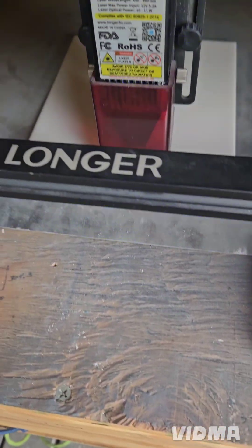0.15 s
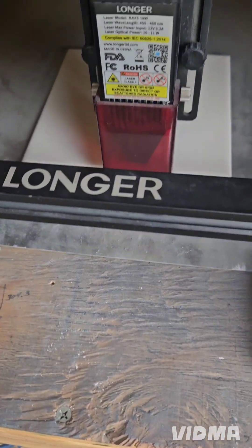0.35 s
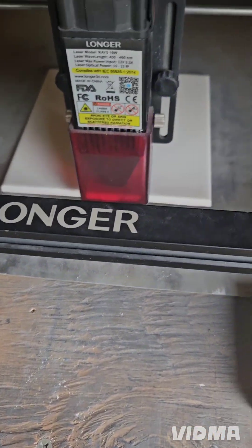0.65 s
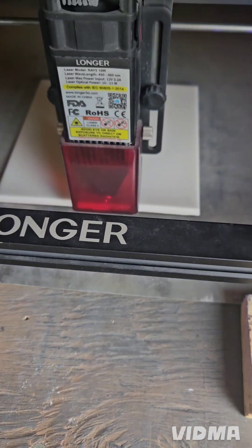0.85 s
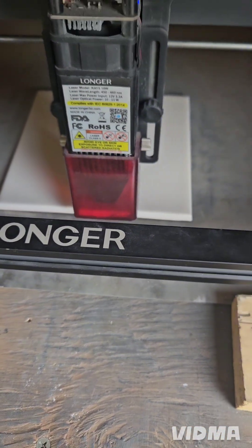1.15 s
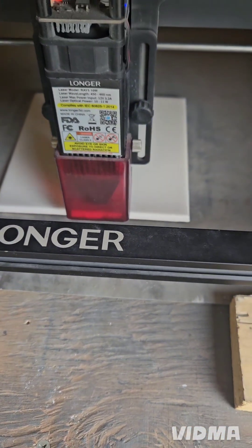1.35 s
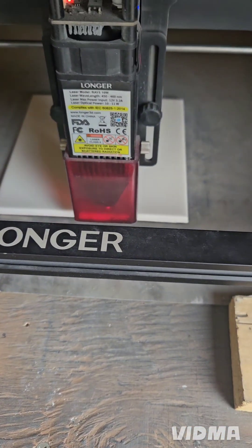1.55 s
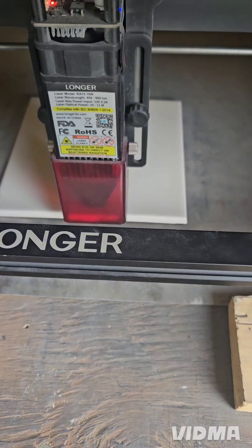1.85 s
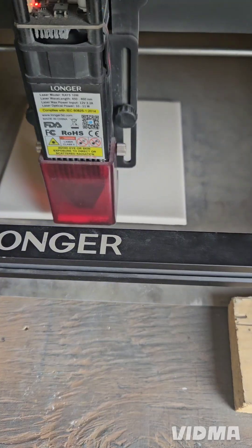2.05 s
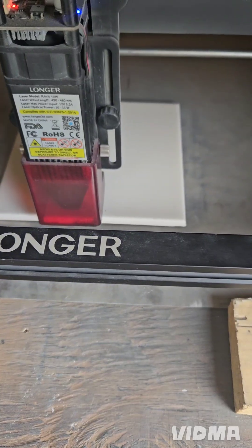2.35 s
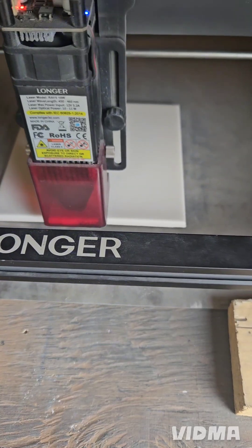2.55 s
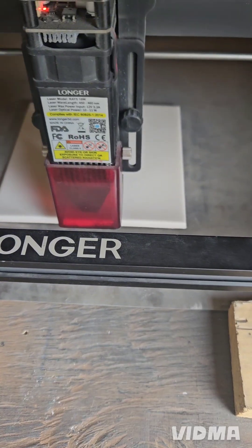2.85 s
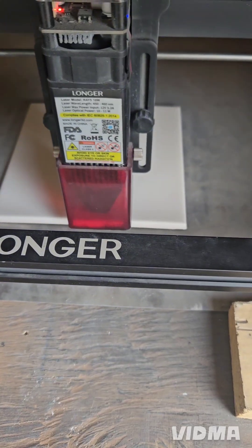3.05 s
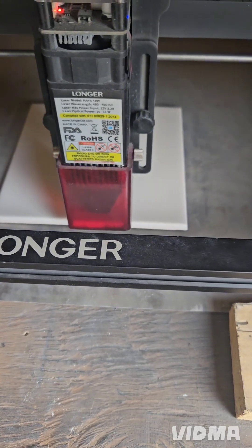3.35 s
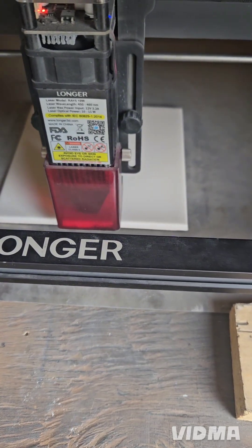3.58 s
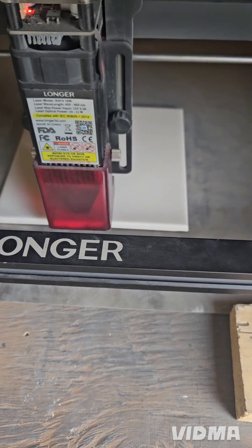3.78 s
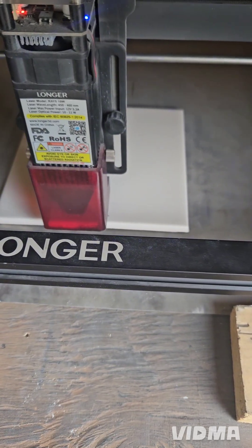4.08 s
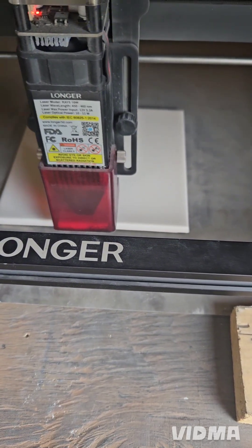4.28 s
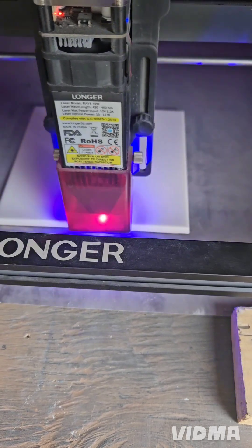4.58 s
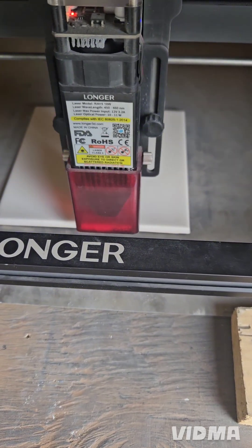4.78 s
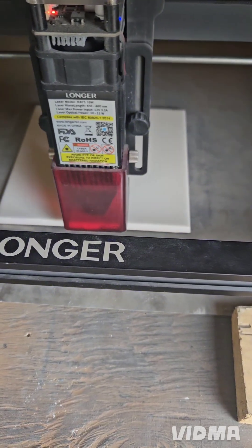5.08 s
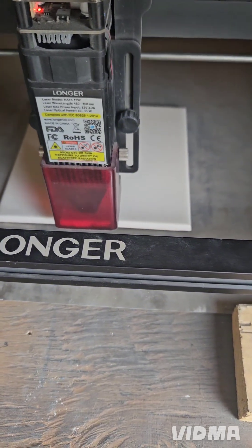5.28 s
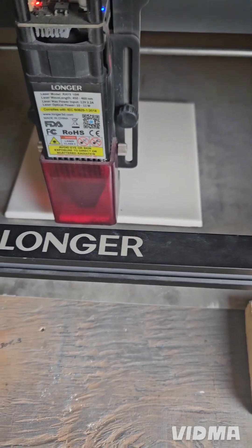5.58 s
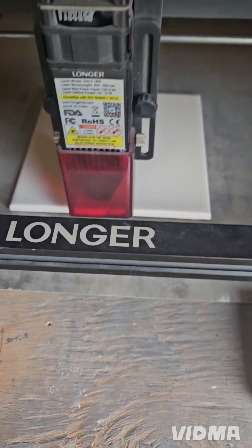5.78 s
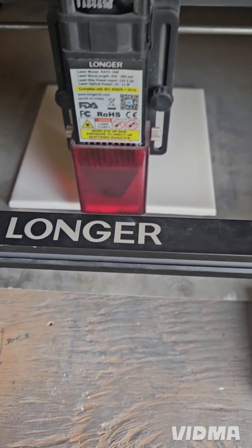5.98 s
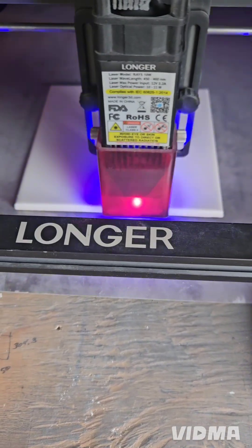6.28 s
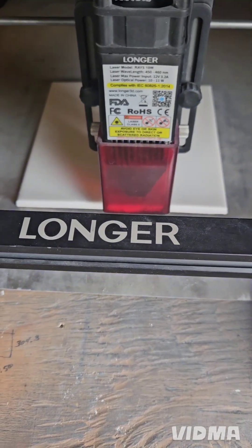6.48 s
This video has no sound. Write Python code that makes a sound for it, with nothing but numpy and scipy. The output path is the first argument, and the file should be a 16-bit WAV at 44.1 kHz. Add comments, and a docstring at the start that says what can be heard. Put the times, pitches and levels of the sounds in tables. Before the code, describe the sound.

A small laser engraver runs close below the microphone, its cooling fans giving a steady airy hum with a low, wavering rumble. For the first 1.7 seconds a motor whines through short sweeps, reversing nearly four times a second, each turn bringing a brief grunt and shudder of the frame. The beam adds tiny buzzing, sizzling bursts about seven times a second, with occasional small pops. A hard belt knock lands just after 1 second. From 1.7 seconds the sweeps lengthen, the whine dipping and the frame jolting about every 0.8 seconds. The burns now come in pairs or small clusters, around 2.4, 3 to 3.4, 4, 4.6 to 5, 5.6 and from 6.2 seconds, the fan pitch sagging slightly with them. A wheel gives thin, falling squeaks between 3.5 and 5 seconds. Another firm knock comes near 6.4 seconds as the machine keeps working.

```python
"""A small diode laser engraver at work, heard from a phone held just above the gantry.
Cooling fans hum throughout, the head fan sagging as the beam fires. A stepper motor whines through short
sweeps, shaking the frame at each reversal; the pulsed beam buzzes, pops and sizzles over each stroke of
the drawing. The slack belt jolts the frame at the turns, with a hard knock just after 1 s. From 1.7 s
the sweeps are longer; a carriage wheel squeaks, most of all between 3.5 and 5 s."""
import sys
import numpy as np
from scipy import signal
from scipy.fft import rfft, irfft
from scipy.io import wavfile

SR = 44100
rng = np.random.default_rng(int(sys.argv[2]) if len(sys.argv) > 2 else 0)


def persist_wave(psi):
    """Save psi, clipped to +-1, as 16-bit WAV."""
    counts = np.round(np.clip(psi, -1, 1) * 32767).astype(np.int16)
    wavfile.write(sys.argv[1], SR, np.atleast_2d(counts).T)


N = 292383
T = np.arange(N) / SR
HZ = np.maximum(np.arange(N // 2 + 1) * SR / N, 1)
COIL_HZ = 87.49  # stepper coil frequency at full speed

# the head reverses just past the drawing:
# t/s, shudder level/dB, grunt f/Hz, grunt over shudder/dB, grunt delay/s, grunt pitch scatter/share
REVERSALS = [(-.021, -33.5, 300, 3.5, 0.021, 0.089), (.247, -34, 410, 2, 0.0029, .04),
             (0.525, -33, 408, 3, 0.0086, 0.032), (0.814, -33, 530, 1.5, 0.0042, .05),
             (1.094, -33.5, 455, 1, 0.013, .07), (1.3748, -34.5, 460, 1.5, 0.019, 0.15),
             (1.664, -31.5, 515, -1.5, 0.022, 0.064), (2.458, -32.5, 490, 0.5, -0.0042, 0.19),
             (3.253, -31.5, 515, 0, .029, 0.11), (4.0478, -31.5, 445, -2, .014, 0.12),
             (4.8388, -34.5, 500, -0.5, 0.012, .13), (5.6252, -34.5, 465, .5, 0.009, 0.071),
             (6.417, -33, 400, -5, -0.015, 0.33)]
# the beam fires over a stroke, on the way into a reversal or out of it:
# t/s, length/s, buzz gain/dB, rasp gain/dB, sizzle gain/dB
STROKES = [(.034, 0.015, -7, 1.5, -1), (0.163, 0.026, -1.5, 2, -2), (0.306, 0.03, -3, -1.5, -2),
           (0.45, 0.014, -4, -1.5, 2.5), (0.586, 0.027, -4, -3, 3.5), (0.72, 0.037, -1, -2, 2.5),
           (0.871, 0.03827, -2.5, -0.5, 2.5), (1.017, 0.02, -14, .5, 0), (1.151, 0.024, -5.5, 0.5, 3.5),
           (1.284, .034, -1.5, -1.5, 0), (1.433, 0.035, 0.5, -2.5, 2.5), (1.575, 0.027, 1.5, 2, 0.5),
           (1.723, 0.029, -2, 0, 1), (1.847, 0.041, 1, -0.5, 3), (2.39, 0.009, -1, -5, -3),
           (2.51, .012, 0, 0, -0.5), (3.021, 0.037, 0.5, -2, 1), (3.157, 0.035, -2.5, 0, 2),
           (3.315, 0.031, 0.5, -1.5, 1.5), (3.44, 0.036, -0.5, 0.5, 0.5), (3.975, .019, -2, 3.5, -2),
           (4.103, 0.0132, 0, 0.5, 3.5), (4.616, .044, -1, -1, 2.5), (4.747, 0.036, -1.5, -1, 0.5),
           (4.895, .035, -3, 0, -1), (5.016, .045, 2, -1, 3.5), (5.552, .018, 3, 0.5, -1.5),
           (5.685, .016, 1, 0, 3), (6.187, 0.053, -0.5, -2.5, 1.5), (6.32, 0.032, 1, -2.5, 0),
           (6.478, 0.04, -1, -1.5, 1), (6.595, 0.027, -1, -2.5, -1)]


def burns(aim_db, beam_hz=1003, rise_s=.00071, fall_s=.0053, settle_s=.0094, heat_s=.0083, chirp_s=.018):
    """Each beam pulse puffs off vapour: a rough chirp, then a buzz and a sizzle once the spot is hot."""
    # spectra of the vapour plume: f/Hz, level/dB
    crackle_spectrum = [(400, -11), (650, 0), (900, 12.5), (1400, 11), (2200, 11), (3400, -6.5), (4800, 1),
                        (6500, -33), (12000, -26)]
    sizzle_spectrum = [(2500, -2), (5500, -10.5), (7400, 7), (8300, 7.5), (9200, -4.5), (11000, -3),
                       (14000, -2.5), (15500, -2.5)]
    # bands among which the plume's hiss wanders: f/Hz
    hiss_bands = [2730, 3000, 4130, 4600, 5200, 6030]
    firing, settled, hot, fresh = 0, 0, 0, 0
    for start, length, buzz_db, rasp_db, sizzle_db in STROKES:
        firing += undb(rasp_db) * gate(start, length, rise_s, fall_s)
        settled += undb(buzz_db) * gate(start, length - .003, settle_s, fall_s)
        hot += undb(sizzle_db) * gate(start, length - .004, heat_s, fall_s)
        fresh += undb(rasp_db) * gate(start, min(chirp_s, length), rise_s, fall_s)
    pulse_hz = beam_hz * (1 + .0065 * drift(120))
    fundamental = tone(pulse_hz * (1 + .04 * drift(200)))
    third = tone(3 * pulse_hz)
    buzz = settled * undb(-40.5) * (undb(-7) * fundamental + tone(2 * pulse_hz) + undb(-14) * third)
    chirp = fresh * undb(-39) * fundamental
    puffs = (1 + .3 * tone(pulse_hz) / np.sqrt(2)) * undb(3 * drift(250))
    crackle = unit(colour(puffs * port_noise(), shape(crackle_spectrum)))
    sizzle = unit(colour(puffs * port_noise(), shape(sizzle_spectrum)))
    hiss = puffs * sum(undb(-55 + 2 * drift(8)) * band(port_noise(), hz, 800) for hz in hiss_bands)
    pitched = (buzz + chirp) * undb(.72 * drift(175))
    rasp = firing * (undb(-38.5) * crackle + hiss)
    return pitched + rasp + pops() + hot * undb(-41 + aim_db) * sizzle


def pops(level_db=-30, pop_s=.0013):
    """Specks of the surface burst under the beam."""
    # bursting specks: t/s, gain/dB
    specks = [(.756, -10), (0.876, -10), (1.019, -15), (1.577, -17), (1.851, -1), (3.026, -3), (3.159, -10),
              (3.444, -5), (3.982, -5), (3.99, 2), (4.62, -7), (4.66, -2), (4.93, 3), (5.059, 5),
              (5.062, 1), (5.56, 5), (6.478, -7)]
    bursts = sum(undb(level_db + db) * gate(s, pop_s, pop_s / 10, pop_s) for s, db in specks)
    return bursts * band(port_noise(), 1560, 2500)


def stepper(speed, flutter_db=2.5, steady_order=40):
    """Torque ripple sings at multiples of the coil frequency and fades as the motor slows."""
    # torque ripple at full speed: multiple of the coil frequency, level/dB
    orders = [(1, -40.5), (2, -48.5), (4, -53), (5, -58), (8, -55), (20, -61), (28, -63), (32, -53),
              (40, -63), (62, -66), (64, -52.6), (66, -54), (80, -72), (90, -72), (96, -70)]
    coil_hz = COIL_HZ * speed * (1 + .00017 * drift(19))
    whine = 0
    for order, db in orders:
        flutter = flutter_db / (1 + (order / steady_order) ** 2) * drift(14)  # the low hum flutters most
        whine += undb(db + flutter) * tone(order * coil_hz)
    return whine * (.031 + .93 * speed ** 2)


def head_speed(ramp_s=.057):
    """Share of full speed: the head brakes evenly into each reversal and speeds up again."""
    gap_s = np.min([np.abs(T - s) for s, *_ in REVERSALS], axis=0)
    return np.minimum(gap_s / ramp_s, 1)


def shudder(speed, grunt_s=.0096, sway_hz=103):
    """At a crawl the motor grunts and jolts the frame; the gantry sways on afterwards."""
    grunts, wobble = 0, drift(150)
    for s, db, hz, grunt_db, delay_s, scatter in REVERSALS:
        grunts += undb(db + grunt_db) * bell(T - s - delay_s, grunt_s) * tone(hz * (1 + scatter * wobble))
    # the step harmonics sweep through the modes of the frame
    steps = sum(tone(order * COIL_HZ * speed) for order in (4, 8, 16))
    rattle = undb(-3.5) * unit(frame(steps + 25 * noise())) * reversal_swell(.034, late_s=.014)
    sway = tone(sway_hz * (1 + .132 * drift(28.1))) * reversal_swell(.06, late_s=.029)
    # the driver sings thinly while the coils are nearly at rest
    chirr = undb(-27) * band(noise(), 6430, 400) * reversal_swell(.07)
    return grunts + rattle + sway + chirr


def reversal_swell(width_s, late_s=0, belt_lag_s=.0091):
    """A bell of level just after each reversal, which reaches the frame late through the belt."""
    turn_s, db = np.transpose(REVERSALS)[:2]
    peak_s = turn_s + belt_lag_s + late_s
    nearest = np.searchsorted((peak_s[1:] + peak_s[:-1]) / 2, T)
    return undb(db)[nearest] * bell(T - peak_s[nearest], width_s)


def belt_knocks(force_db=29, sway_db=-23, sway_hz=108, sway_s=.021):
    """The belt takes up its slack with blows and bounces; the hardest leaves the gantry swaying."""
    # blows on the gantry: t/s, relative force/dB, contact time/s
    blows = [(0.2537, -11.5, 0.00021), (0.2693, -14, .0004), (0.531, -9, 0.00039), (0.821, -14, .0004),
             (.834, -14.5, 0.00022), (1.149, 2.5, 0.00033), (1.157, -14, 0.0002), (1.166, -17, 0.00038),
             (1.176, -9, 0.00025), (1.672, -1, 0.00076), (1.683, -16, 0.00079), (1.699, -10.5, .0002),
             (1.718, -13.5, 0.00044), (2.473, -14, 0.00065), (2.4784, -10, 0.00034),
             (3.2633, -4.5, 0.00047), (3.278, -16, 0.00037), (3.307, -10, 0.00045), (4.065, -7, 0.00097),
             (4.851, -19, 0.00029), (4.863, -8, 0.00032), (5.644, -13, 0.00021), (6.402, -11, 0.00023),
             (6.419, -11, 0.00034), (6.43, -1.5, 0.00072)]
    force = np.zeros(N)
    for s, db, contact_s in blows:
        span = slice(int((s - .01) * SR), int((s + .01) * SR))
        push = bell(T[span] - s, contact_s)
        force[span] += undb(db) * push / push.sum()
    hardest_s = max(blows, key=lambda row: row[1])[0]
    sway = undb(sway_db) * gate(hardest_s, sway_s, sway_s / 4, sway_s) * tone(np.full(N, sway_hz))
    return undb(force_db) * frame(force) + sway


def frame(force, soft_hz=2600):
    """The frame rings in its modes; belt and rubber feet soak up the treble."""
    # modes of the frame: f/Hz, width/Hz, gain/dB
    modes = [(87.5, 6.2, 6), (141.4, 30, 2), (208.5, 22, 2), (300.5, 48, -1.5), (432, 14.5, 2),
             (536.5, 24, -5.5), (685, 71, -8)]
    response = sum(undb(db) * resonance(hz, width) for hz, width, db in modes)
    return colour(force, response / (1 + 1j * HZ / soft_hz) ** 2)


def wheel_squeaks():
    """A carriage wheel rubs on its rail in short, thin glides."""
    # squeaks: t/s, length/s, first f/Hz, last f/Hz, level/dB, pitch scatter/share
    glides = [(1.38, .3, 11380, 11480, -60, .008), (3.565, .115, 5350, 5100, -45, .012),
              (3.605, .105, 2660, 2470, -45.5, .028), (3.655, .08, 4900, 4550, -50.5, .04),
              (3.68, .13, 4200, 3850, -51.5, .055), (3.82, .14, 3500, 2950, -50, .07),
              (4.85, .05, 5300, 5100, -49, .018), (4.83, .08, 2600, 2480, -48, .022),
              (4.93, .18, 3900, 3300, -52, .06)]
    out = 0
    for start, length, first_hz, last_hz, db, scatter in glides:
        progress = np.clip((T - start) / length, 0, 1)
        hz = (first_hz + (last_hz - first_hz) * progress) * (1 + scatter * drift(300))
        out += undb(db + 2 * drift(69)) * np.sin(np.pi * progress) * tone(hz)
    return out


def fan_tones(full_speed_hz=585.8):
    """Blade tones follow the head fan's speed, the other fans hum on; all waver in the turbulent air."""
    # fan on the laser head: multiple of the blade rate, level/dB
    blade_orders = [(1, -62), (2, -49), (3, -57.5), (4, -63), (5, -53), (7, -60.5)]
    # hum of the other fans: f/Hz, level/dB
    hums = [(118.4, -44.5), (248, -50)]
    blade_hz = full_speed_hz * fan_speed() * (1 + .000597 * drift(5))
    blades = sum(undb(db + .74 * drift(9)) * tone(order * blade_hz) for order, db in blade_orders)
    hum = sum(undb(db + 2 * drift(16.7)) * tone(hz * (1 + .0065 * drift(25))) for hz, db in hums)
    return blades + hum


def fan_speed(sag=.052, inertia_s=.27):
    """Share of full speed: the beam loads the supply, so the head fan slows in burns, then recovers."""
    beam_on = sum((T > start) & (T < start + length) for start, length, *_ in STROKES)
    step = 1 / (inertia_s * SR)
    return 1 - sag * signal.lfilter([step], [1, step - 1], beam_on)


def fan_air(level_db=-36.5, shared_hz=500):
    """Air rushes through the housing; the two microphone ports share its bass more than its treble."""
    # rush of the fans: f/Hz, level/dB
    rush = [(20, -12), (40, 1), (75, 5.5), (105, 3), (160, -7), (330, -10), (800, -10.5), (1250, -11.5),
            (1750, -15.5), (2500, -16), (5000, -20), (6400, -26.5), (8400, -24), (9700, -40.5),
            (11000, -39.5), (15000, -43)]
    # resonances of the fan housing: f/Hz, width/Hz, gain/dB
    housing = [(470, 17, 1.5), (515, 75, 5.5), (904, 25, 10), (1052, 46, 7), (1413, 138, 6),
               (1684, 294, 8.5), (2610, 190, -3), (2896, 61, 7.5), (3090, 170, 3.5), (3400, 130, -4.5),
               (3840, 110, -0.5), (4370, 250, -4.5), (7040, 130, 0.5)]
    gain = shape(rush) * undb(sum(db * np.abs(resonance(hz, width)) ** 2 for hz, width, db in housing))
    alike = .5 + .5 / (1 + (HZ / shared_hz) ** 2)
    left = noise()
    right = colour(left, alike) + colour(noise(), np.sqrt(1 - alike ** 2))
    return np.array([unit(colour(side, gain)) for side in (left, right)]) * undb(level_db)


def swell_rumble(fans, corner_hz=85, swing_db=2.4):
    """The fans' low rumble swells and sinks at random about a slow trend."""
    # trend of the rumble: t/s, gain/dB
    trend = [(0, -3), (2, 1.5), (3.6, -2.5), (4.3, -0.5), (5.3, 3), (5.9, 3.5), (6.63, -1)]
    gain = undb(np.interp(T, *np.transpose(trend)) + swing_db * drift(6))
    return fans + (gain - 1) * colour(fans, 1 / (1 + (HZ / corner_hz) ** 4))


def enclosure(x, t60_s, wet_db):
    """Close walls return a short wash, different at each port; the bass stays direct."""
    tail = np.exp(-np.log(1000) * T / t60_s) * (T > .001)
    washes = [colour(unit(noise() * tail), HZ / (HZ + 400)) / np.sqrt(N) for _ in range(2)]
    return np.array([port + undb(wet_db) * signal.fftconvolve(port, wash[:N // 2])[:N]
                     for port, wash in zip(np.broadcast_to(x, (2, N)), washes)])


def undb(db):
    """Decibels to gain."""
    return 10 ** (np.asarray(db) / 20)


def unit(x):
    """Scale to rms 1."""
    return x / np.sqrt(np.mean(x ** 2))


def shape(points):
    """Gain at every frequency from points of f/Hz, level/dB."""
    hz, db = np.transpose(points)
    return undb(np.interp(np.log(HZ), np.log(hz), db))


def colour(x, gain):
    """Filter with a gain for every frequency."""
    return irfft(rfft(x) * gain, N)


def shelf(x, corner_hz, db):
    """Move everything above a corner by a level curve."""
    return x + (undb(db) - 1) * colour(x, 1 / (1 + (corner_hz / HZ) ** 4))


def resonance(hz, width):
    """Response of one damped mode, 1 at its centre."""
    return 1 / (1 + 1j * (HZ ** 2 - hz ** 2) / (HZ * width))


def band(x, hz, width):
    """One resonant band of a signal, at rms 1."""
    return unit(colour(x, resonance(hz, width) ** 2))


def noise():
    """White noise."""
    return rng.standard_normal(N)


def port_noise(alike=.15):
    """White noise at the two microphone ports, only partly alike."""
    left = noise()
    return np.array([left, alike * left + np.sqrt(1 - alike ** 2) * noise()])


def drift(rate_hz):
    """Random drift of rms 1, mostly slower than the given rate."""
    knots = rng.standard_normal(int(2 * rate_hz * N / SR) + 3)
    return unit(np.interp(2 * rate_hz * T + rng.random(), np.arange(len(knots)), knots))


def tone(hz):
    """A sine of rms 1 on a pitch curve."""
    return np.sqrt(2) * np.sin(2 * np.pi * (np.cumsum(hz) / SR + rng.random()))


def bell(offset_s, width_s):
    """Gaussian envelope, 1 at zero offset."""
    return np.exp(-.5 * (offset_s / width_s) ** 2)


def gate(start, length, rise, fall):
    """Envelope that opens at start, holds for length and dies away."""
    out = np.zeros(N)
    span = slice(max(int(start * SR), 0), int((start + length + 10 * fall) * SR))
    age = np.maximum(T[span] - start, 0)
    out[span] = (1 - np.exp(-age / rise)) * np.exp(-np.maximum(age - length, 0) / fall)
    return out


def scene():
    """The machine at the phone's two microphone ports, hand-held just above the gantry."""
    # where the phone is held, each level taken about its mean: t/s, nearness to the head/dB, treble/dB
    phone_path = [(0.0, -49, -58), (0.98, -43.5, -64), (1.31, -43.5, -56.5), (1.989, -41.5, -57.5),
                  (5.04, -41.5, -57.5), (5.56, -41.5, -55.5), (5.78, -43.5, -61.5), (5.95, -43.5, -68),
                  (6.63, -45.5, -59.5)]
    # the motor's high whine as it reaches the phone: t/s, gain/dB
    whine_reach = [(0, -26), (.4, -6.5), (2.6, -1.5), (4.2, -1.5), (5.4, -1.5), (6.63, -3.5)]
    # right port against left port: f/Hz, gain/dB
    far_port = [(30, 3), (110, -3.5), (350, -4), (750, -8.5), (1100, -4), (1500, -12.5), (2100, -0.5),
                (3000, -9), (4500, -2), (6500, -11), (15000, -10)]
    s, *levels = np.transpose(phone_path)
    near_db, aim_db = (np.interp(T, s, db - np.mean(db)) for db in levels)
    speed = head_speed()
    fans = shelf(fan_air() + fan_tones(), 1570, near_db)
    # treble from the fan outlet is beamed, so it falls when the phone is off to one side
    fans = swell_rumble(shelf(fans, 5800, aim_db - near_db))
    motor = shelf(stepper(speed), 1800, np.interp(T, *np.transpose(whine_reach)))
    jolts = enclosure(shudder(speed) + belt_knocks(), t60_s=.07, wet_db=-3)
    jolts *= undb([[0], [-2.5]])  # the frame is closest to the left port
    head = enclosure(burns(aim_db) + wheel_squeaks(), t60_s=.081, wet_db=-5)
    left, right = fans + motor + jolts + head
    # treble reaches the right port late; the lows come through the table to both at once
    lag_s = .00052 / (1 + (1100 / HZ) ** 4)
    return np.array([left, colour(right, shape(far_port) * np.exp(-2j * np.pi * HZ * lag_s))])


def record(dry):
    """The treble dips in a notch near 10 kHz, and the top is cut."""
    notch_hz, top_hz = 9750, 15400
    notch = undb(-16 * np.exp(-((HZ - notch_hz) / 720) ** 4))
    top_cut = signal.ellip(10, .2, 80, top_hz, fs=SR, output="sos")
    return signal.sosfilt(top_cut, colour(dry, notch))


dry = scene()
out = record(dry)
persist_wave(out)
```